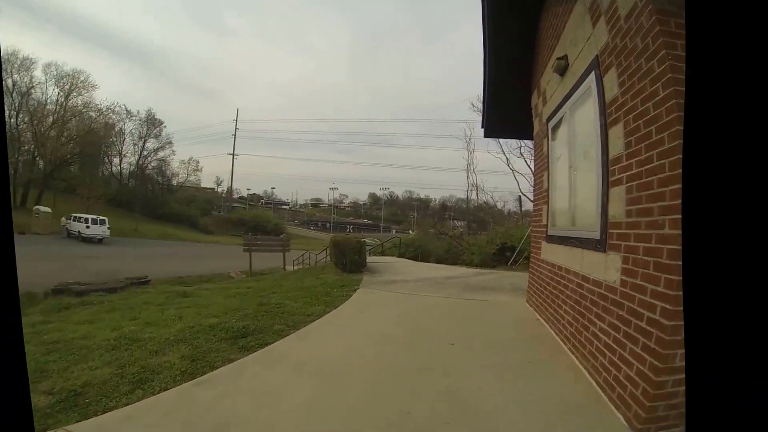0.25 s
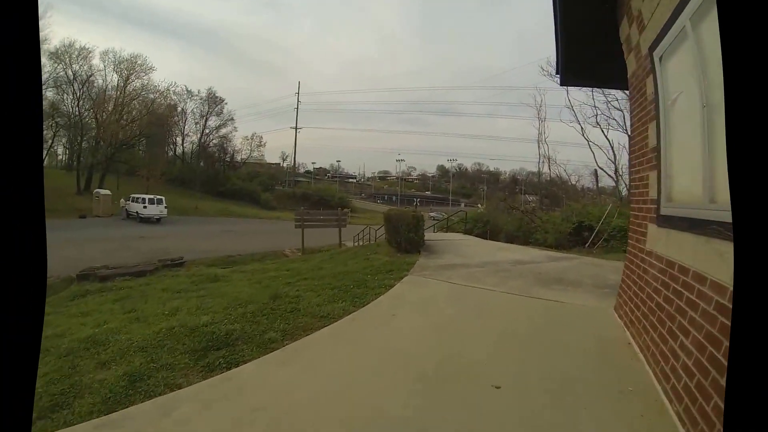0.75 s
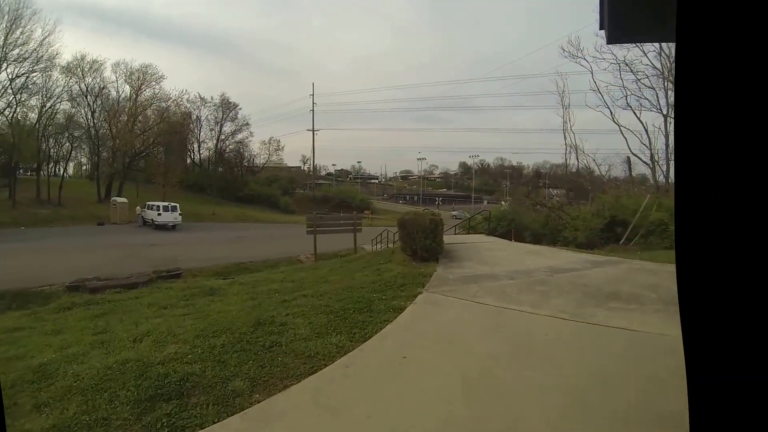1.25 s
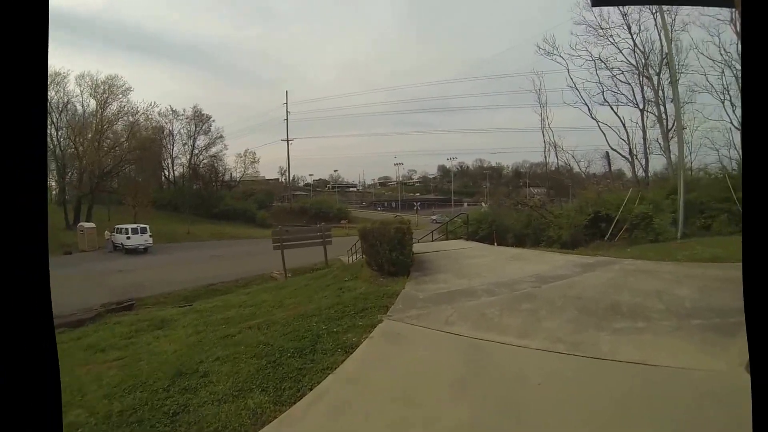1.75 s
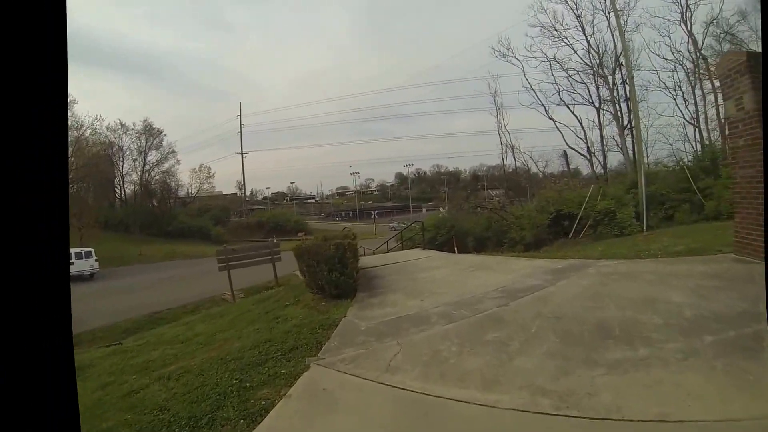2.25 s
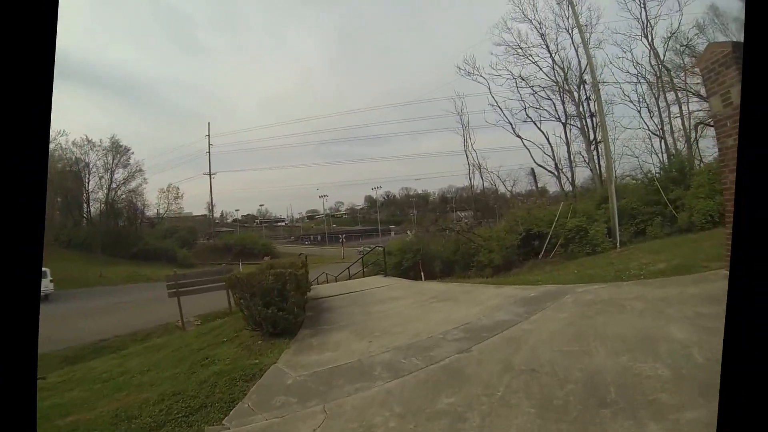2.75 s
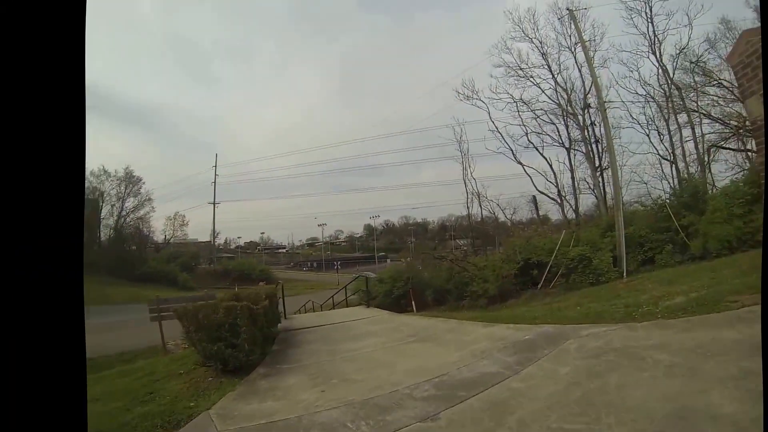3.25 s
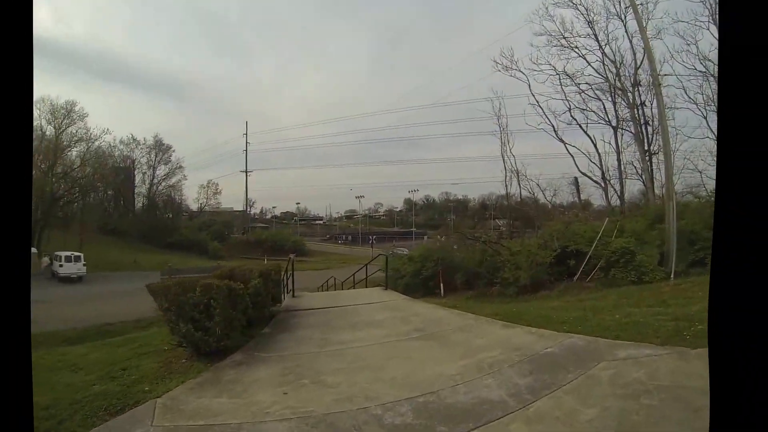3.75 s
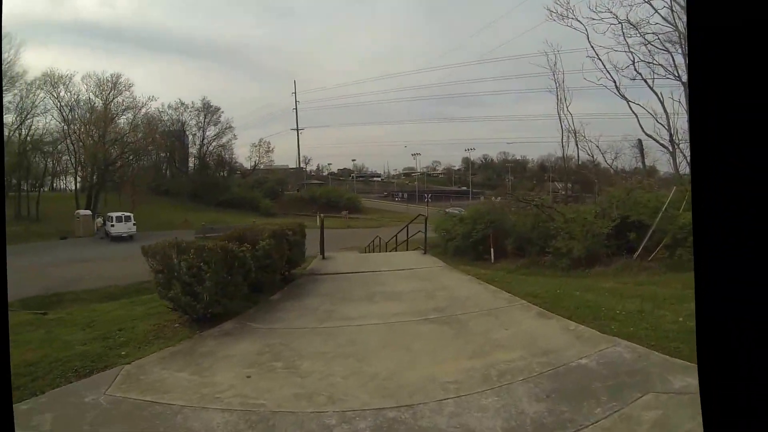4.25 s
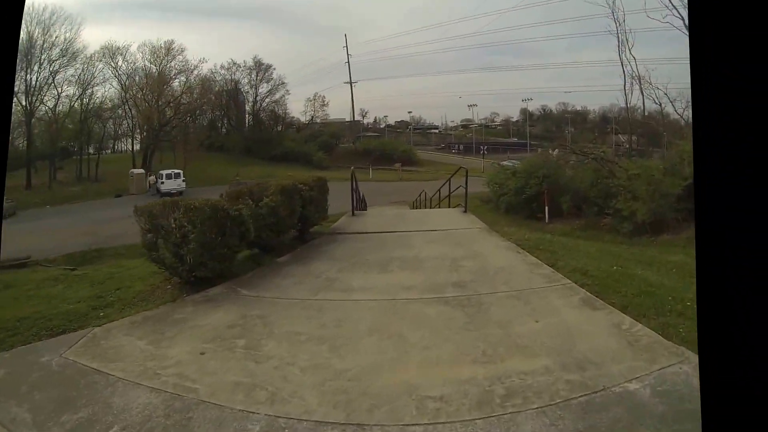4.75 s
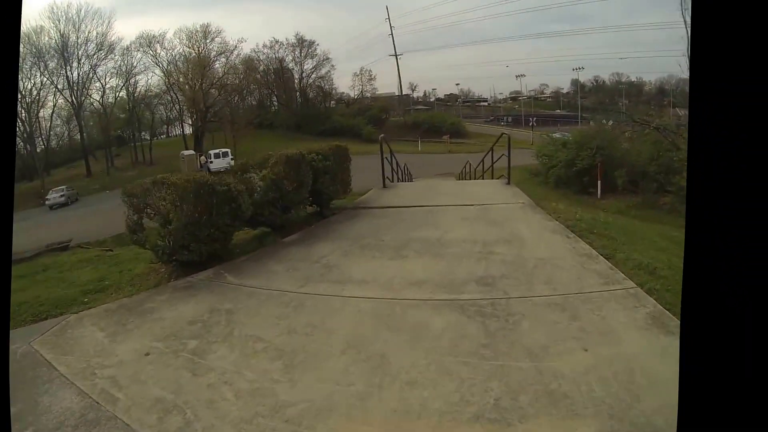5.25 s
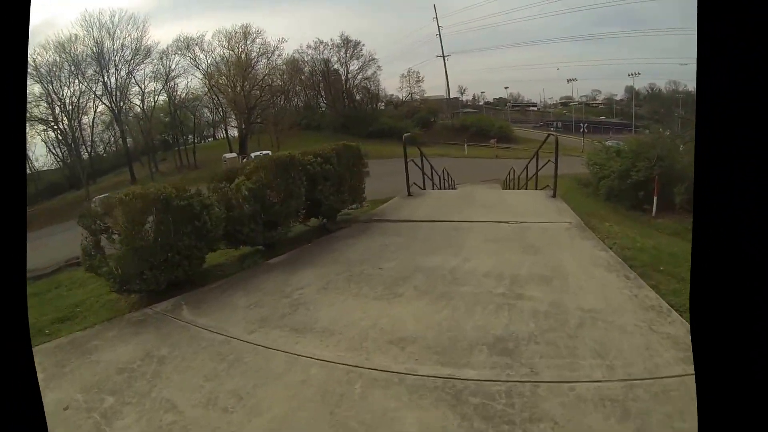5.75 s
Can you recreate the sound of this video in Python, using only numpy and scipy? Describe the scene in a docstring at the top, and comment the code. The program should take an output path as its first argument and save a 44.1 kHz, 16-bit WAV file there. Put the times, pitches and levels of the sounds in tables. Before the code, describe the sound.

A skateboard rolls on an outdoor concrete path for about six seconds, heard close from a microphone riding along in a hard case, which adds a hollow, nasal tone. Gritty wheel noise continues throughout over low, fluttering wind and faint hiss. The opening second is coarser, with quick double knocks at pavement joints around 0.4, 0.8 and 1.0 seconds. At 1.1 a very hard, bright clack overloads and leaves a short metallic ring. Rolling softens, then a gust buffets the microphone from 2.5, ending in another hard, thumping, ringing clack at 2.9. A scuff and a smaller clack follow near 3.15, and joints knock at 3.3 and 3.6. The rolling runs smoothly until a scuff and double clack around 5.15. From 5.2 to 5.9 sand crunches and loose parts chatter, with more joint knocks at 5.5 and 5.8, and the board is still rolling at the end.

```python
"""On a concrete path, close to a rolling skateboard: the microphone rides along in a hard camera case.
Wheel grit and the knocks of pavement joints come through the case, which honks near 1.5 kHz.
The hardest clacks overload the microphone and leave a metal part ringing. Loose parts chatter,
and sand crunches near the end. Moving air rumbles and buffets underneath, over a faint hiss."""
import sys
import numpy as np
from scipy import signal
from scipy.fft import rfft, irfft, next_fast_len
from scipy.io import wavfile
from scipy.ndimage import uniform_filter1d

SR = 44100
rng = np.random.default_rng(int(sys.argv[2]) if len(sys.argv) > 2 else 0)


def int16_out(signal):
    """Quantize to a 16-bit WAV file."""
    q = np.round(np.clip(np.atleast_2d(signal).T, -1, 1) * 32767)
    wavfile.write(sys.argv[1], SR, q.astype(np.int16))


N = 265041
TIME = np.arange(N) / SR
BINS = np.fft.rfftfreq(2048, 1 / SR)

# Rolling effort from speed and pavement, a sandy stretch, air with one strong gust near 2.8 s, and hiss.
# Each row: time in seconds, level in dB.
ROLL_LEVEL = [(0.0, -45.5), (1.0, -51.5), (1.4, -48.5), (1.75, -51.5), (2.6, -51), (3.4, -53), (3.8, -49.5),
              (4.7, -48.5), (5.15, -43.5), (5.68, -45.5), (5.86, -48.5), (6.01, -48.5)]
SAND_LEVEL = [(5.2, -96), (5.28, -60), (5.42, -66), (5.57, -55), (5.75, -63), (5.83, -64), (5.9, -94)]
AIR_LEVEL = [(0.0, -33.5), (0.45, -30), (0.6, -34), (1.15, -38.5), (1.4, -27.5), (1.7, -36), (2.35, -37.5),
             (2.55, -27), (2.88, -20), (2.96, -30.5), (3.55, -31), (3.9, -39), (4.7, -34.5), (5.45, -27.5),
             (5.75, -37), (6.01, -25.5)]
HISS_LEVEL = [(0.0, -63), (1.9, -64), (3.3, -61), (6.01, -59)]
# Coarser patches of concrete. Each row: middle and length in seconds, then grit, roar and case hum in dB.
COARSE_PATCHES = [(0.068, 0.46, -44.5, -46.5, -36), (0.732, 0.42, -49.5, -47, -46),
                  (1.417, 0.61, -59.5, -56.5, -65), (2.963, 0.74, -44.5, -52, -56.5),
                  (5.554, 0.22, -41, -42.5, -43)]
# Hard clacks. Each row: start in seconds, level in dB, case ring in Hz, treble lift in dB, thump in dB,
# thump pitch in Hz, metal ring in dB, bounce in dB, time to the rebound in seconds.
HARD_CLACKS = [(1.1092, 6.5, 2000, 14, -8, 194, -29, 3.5, 0.0051),
               (2.9203, 6.5, 1690, 0, -1.5, 647, -34.5, -5.5, 0.0037),
               (3.1558, -2.5, 1597, -5, -36, 150, -52, -25.5, 0.006),
               (5.151, -3.5, 1570, -1.5, -39, 150, -48, -20, 0.0044),
               (5.1754, -6, 1570, -11, -32, 200, -59, -28, 0.005)]
# Modes of the metal part. Each row: pitch in Hz, relative level in dB, seconds to fall 60 dB.
METAL_MODES = [(1965, -6, .55), (2412, -4, .18), (2654, 0, .23), (2939, -31, .7), (3478, -14, .63),
               (4091, -32, .5), (4290, -38, .6), (4791, -36, .35), (5469, -39, .65), (5911, -40, .5),
               (6347, -52, .45), (7400, -56, .35), (9679, -64, .6)]
# Joints, crossed by one wheel and then another. Each row: start and gap in seconds,
# first and second peak in dB, case ring in Hz, sharpness in dB.
PAVEMENT_JOINTS = [(0.380, 0.016, -14.5, -20.5, 1455, 14.5), (0.819, 0.012, -27.5, -27.5, 1460, 12.5),
                   (0.9669, 0.0426, -19.5, -23, 1280, 8.5), (3.292, 0.029, -20, -23, 1220, 7.5),
                   (3.5553, 0.0448, -27.5, -17.5, 1470, -5), (5.486, 0.0282, -22.5, -19.5, 1355, -6.5),
                   (5.8015, 0.0203, -21.5, -14.5, 1330, -13)]
# Single jolts of loose parts. Each row: start in seconds, peak in dB, sharpness in dB.
LOOSE_KNOCKS = [(0.163, -30.5, -1), (1.098, -22.5, 3), (1.207, -22, -13), (1.303, -33.5, 3),
                (2.9892, -22.5, -13), (3.1241, -28, -3), (3.137, -26, 18), (5.2746, -22, -4),
                (5.317, -26, -12), (5.5724, -17, -4), (5.592, -27, -4), (5.742, -26.5, -8),
                (5.9954, -19, -11)]
# Scuffs that build up to a clack. Each row: start and end in seconds, level in dB.
SCUFF_SPANS = [(0.765, 0.852, -50.5), (2.795, 2.92, -54), (3.0, 3.17, -55), (3.09, 3.167, -45),
               (5.068, 5.14, -45)]
# The largest buffets of air on the case. Each row: middle in seconds, level in dB, pitch in Hz.
AIR_BUFFETS = [(2.707, -15.5, 106), (2.732, -11, 126), (2.747, -13.5, 61), (2.795, -13, 65),
               (2.84, -28, 130), (2.868, -12, 44.6), (2.888, -13.5, 60), (2.989, -20.5, 79),
               (3.391, -23.5, 89), (3.502, -28.5, 103.7), (3.78, -25.5, 86.5)]
# The tone of each source at the microphone. Each row: frequency in Hz, relative level in dB.
GRIT_SPECTRUM = [(700, -21.5), (1030, -23), (1150, -1), (1280, 2.5), (1480, -1), (1650, -4.5),
                 (1900, -22.5), (2300, -18), (2800, -30), (3400, -26.5), (4200, -46.5), (5200, -43.5),
                 (9000, -44.5), (15000, -58)]
ROAR_SPECTRUM = [(40, -5), (110, -7.5), (220, 4.5), (380, -2.5), (550, 3), (760, -5), (1000, -7),
                 (1500, -13.5), (3000, -45.5), (12000, -94.5)]
SAND_SPECTRUM = [(100, 1.5), (600, 5.5), (1000, -0.5), (2300, 3.5), (3600, 6.5), (4300, -5.5), (5300, 0.5),
                 (7000, -9.5), (9500, -19), (13000, -19.5), (16000, -23.5)]
CLACK_SPECTRUM = [(60, -31), (500, -28.5), (900, -25), (1100, -14), (1270, -6), (1520, 3.5), (1790, 1),
                  (2100, -5), (2900, -10.5), (3650, -15), (3950, -46.5), (5000, -38.5), (8000, -61),
                  (15000, -83)]
KNOCK_SPECTRUM = [(60, -20.5), (250, -11.5), (400, -13), (530, -9), (850, -13), (1050, -9), (1250, 2.5),
                  (1550, 1), (1880, -14.5), (2250, -11.5), (2750, -23.5), (3400, -20.5), (4200, -42),
                  (5200, -37.5), (9000, -47.5), (15000, -66.5)]
SCUFF_SPECTRUM = [(900, -17.5), (1400, 9), (1900, 10.5), (2600, -4.5), (3600, -11), (4200, -30),
                  (10000, -66)]
RUMBLE_SPECTRUM = [(8, -16), (22, 5.5), (38, -2), (55, -3.5), (72, -15), (95, -25.5), (150, -29),
                   (300, -45), (700, -92), (5000, -130)]
HISS_SPECTRUM = [(1500, 5), (2300, 2.5), (2800, 3), (3600, 8), (4300, -5), (5200, 1.5), (5900, -9.5),
                 (7900, -8), (9200, -14), (9950, -5), (11000, -11), (13500, -12), (14300, -15),
                 (16000, -10)]
SWISH_SPECTRUM = [(3000, -25), (5500, 0), (10000, 1), (14500, 2), (15500, -20)]

KNOCK_HZ = 1332  # where loose parts ring the case


def rolling(grit_db=-1.5, roar_db=-7.0, patch_db=1, grains_per_s=700, grain_share=0.47):
    """Wheels on rough concrete, close up: a fine wash and single grains, swelling with the surface."""
    surface = amp(0.82 * wander(hz=34.5))
    grains = grain_share * unit(rng.standard_normal(N) * chance(grains_per_s))
    grit = colour(rng.standard_normal(N) + grains, GRIT_SPECTRUM)
    roar = colour(rng.standard_normal(N) + grains, ROAR_SPECTRUM)
    effort_db = curve(ROLL_LEVEL)
    grit_level = np.hypot(amp(effort_db + grit_db), amp(patch_db) * patches(column=2))
    roar_level = np.hypot(amp(effort_db + roar_db), amp(patch_db) * patches(column=3))
    return surface * (grit * grit_level + roar * roar_level)


def patches(column):
    """Gain of one layer, rising and falling as the wheels cross each coarser patch."""
    gain = np.zeros(N)
    for row in COARSE_PATCHES:
        middle, length = row[:2]
        position = np.clip((TIME - middle) / length, -.5, .5)
        gain += amp(row[column]) * np.cos(np.pi * position) ** 2
    return gain


def case_hum(hum_hz=1257, width_hz=170):
    """Dense grit on the coarser patches drives the lowest resonance of the case."""
    hum = shape(rng.standard_normal(N), lambda hz: bell(hz, hum_hz, width_hz))
    return hum * patches(column=4)


def clacks(crack_s=0.0015, thump_cycles=0.36, ring_tilt=0.7):
    """A hard blow raps the case and bounces, thumps the mount, and rings the metal for much longer."""
    out, t = np.zeros(N), np.arange(SR) / SR
    for s, db, case_hz, lift_db, thump_db, thump_hz, ring_db, bounce_db, rebound_s in HARD_CLACKS:
        add(out, s, amp(db) * rap(case_hz, lift_db))
        # a bright crack follows, then a duller rebound
        add(out, s + crack_s, amp(bounce_db + 1.5) * rap(case_hz=3170, lift_db=26.5))
        add(out, s + rebound_s, amp(bounce_db - 4) * rap(case_hz=1620, lift_db=9))
        thump = np.sin(2 * np.pi * thump_hz * t) * np.exp(-thump_hz * t / thump_cycles)
        add(out, s, amp(thump_db) * thump)
        for hz, mode_db, t60 in METAL_MODES:
            # a sharper blow reaches the higher modes
            start_db = ring_db + mode_db + ring_tilt * lift_db * np.log2(hz / 2500)
            add(out, s, amp(start_db - 60 * t / t60) * np.sin(2 * np.pi * hz * t))
    return out


def rap(case_hz, lift_db, ring_db=6):
    """One hard contact briefly rings the case around the microphone."""
    resonance_db = ring_db * bell(BINS, case_hz, width_hz=440)
    treble_db = lift_db * shelf(BINS, corner_hz=2260)
    case = response(spectrum_db(CLACK_SPECTRUM, BINS) + resonance_db + treble_db)
    return signal.fftconvolve(blow(chatter=0.018, t60=0.033), case)


def blow(chatter, t60):
    """One firm contact, then fine random chatter falling 60 dB in t60 seconds."""
    t = np.arange(SR // 8) / SR
    force = chatter * rng.standard_normal(len(t)) * amp(-60 * t / t60)
    force[0] = 1
    return force


def knocks(ring_db=6, treble_share=0.27):
    """Jolted parts touch and chatter to rest; sharp contacts bring out the case's upper resonance."""
    out = np.zeros(N)
    upper = bell(BINS, centre_hz=2275, width_hz=530) + treble_share * shelf(BINS, corner_hz=2900)
    for s, db, hz, sharp_db in jolts() + rattles():
        resonance_db = ring_db * bell(BINS, hz, width_hz=130)
        case = response(spectrum_db(KNOCK_SPECTRUM, BINS) + resonance_db + sharp_db * upper)
        knock = signal.fftconvolve(blow(chatter=0.21, t60=0.048), case)
        add(out, s, amp(db) * knock / abs(knock).max())
    return out


def jolts(shake_s=0.006, shake_db=-21):
    """The firm knocks. Each row: start in seconds, peak in dB, case ring in Hz, sharpness in dB."""
    rows = [(s, db, KNOCK_HZ, sharp_db) for s, db, sharp_db in LOOSE_KNOCKS]
    # each clack shakes the loose parts, a little later and weaker
    rows += [(s + shake_s, db + shake_db, KNOCK_HZ, 0) for s, db, *_ in HARD_CLACKS]
    for s, gap, first_db, second_db, hz, sharp_db in PAVEMENT_JOINTS:
        rows += [(s, first_db, hz, sharp_db), (s + gap, second_db, hz, sharp_db)]
    return rows


def rattles(per_s=70, above_sand_db=28.5, sharp_db=-4):
    """Small random knocks, as strong as the path is sandy; same columns as the jolts."""
    db = curve(SAND_LEVEL) + above_sand_db + 2 * rng.standard_normal(N)
    on_sand = (SAND_LEVEL[0][0] < TIME) & (TIME < SAND_LEVEL[-1][0])
    return [(TIME[i], db[i], KNOCK_HZ, sharp_db) for i in np.flatnonzero(chance(per_s) & on_sand)]


def sand_crunch(grains_per_s=130, jolt_db=23, decay_s=0.005):
    """Loose sand crunches under the wheels in short bursts, hardest when the board is jolted."""
    hits = chance(grains_per_s) * rng.uniform(0.95, 1, N)
    for s, db, *_ in jolts():
        add(hits, s, amp([db + jolt_db]))
    fade = np.exp(-TIME[:SR // 10] / decay_s)
    bursts = signal.fftconvolve(hits, fade)[:N] * rng.standard_normal(N)
    return amp(curve(SAND_LEVEL)) * colour(bursts, SAND_SPECTRUM)


def scuffs(rough_db=3):
    """Short gritty rubs: noise with a fast flicker in level."""
    level = np.zeros(N)
    for start, end, db in SCUFF_SPANS:
        add(level, start, amp(db) * signal.windows.tukey(round((end - start) * SR), .5))
    rub = rng.standard_normal(N) * amp(rough_db * wander(hz=200))
    return level * colour(rub, SCUFF_SPECTRUM)


def wind(rumble_db=-1, steadiness=0.42, flutter_db=3.0):
    """Air moving over the case: a low, fluttering turbulence with eddies on top."""
    air_db = curve(AIR_LEVEL)
    rumble = colour(rng.standard_normal(N), RUMBLE_SPECTRUM)
    strength = np.sqrt(abs(uniform_filter1d(rumble ** 2, size=4000)) + 1e-6)
    steadied = unit(rumble / strength ** steadiness)
    return eddies(air_db) + steadied * amp(air_db + rumble_db + flutter_db * wander(hz=14))


def eddies(air_db, per_s=16, gust_db=-17.5, growth=2.05, typical_hz=105, decay_cycles=0.3):
    """Large buffets and small random eddies each push and pull the air at the case once."""
    eddy_db = gust_db + growth * (air_db - air_db.max())  # weaker in calmer air
    eddy_hz = typical_hz * 2 ** rng.standard_normal(N)
    small = [(TIME[i], eddy_db[i], eddy_hz[i]) for i in np.flatnonzero(chance(per_s))]
    out, t = np.zeros(N), np.arange(-SR // 20, SR // 20) / SR
    for s, db, hz in AIR_BUFFETS + small:
        pulse = np.cos(2 * np.pi * hz * t) * np.exp(-abs(hz * t) / decay_cycles)
        add(out, s + t[0], amp(db) * pulse)
    return signal.sosfiltfilt(signal.butter(4, 450, fs=SR, output="sos"), out)


def swish(start_s=1.365, length_s=0.06, level_db=-69):
    """A brief, faint, very high swish of noise."""
    out, count = np.zeros(N), round(length_s * SR)
    noise = colour(rng.standard_normal(count), SWISH_SPECTRUM)
    add(out, start_s, amp(level_db) * noise * signal.windows.tukey(count, .5))
    return out


def hiss():
    """Faint even hiss behind everything, coloured by the case."""
    return colour(rng.standard_normal(N), HISS_SPECTRUM) * amp(curve(HISS_LEVEL))


def amp(db):
    """Decibels to gain."""
    return 10 ** (np.asarray(db) / 20)


def unit(x):
    """Scales to rms 1."""
    return x / np.sqrt(np.mean(x ** 2) + 1e-20)


def curve(rows):
    """A table of levels over time, at every sample."""
    return np.interp(TIME, *np.transpose(rows))


def spectrum_db(points, hz):
    """A spectrum in dB, interpolated on a log-frequency axis."""
    f, db = np.transpose(points)
    return np.interp(np.log(hz + 1), np.log(f + 1), db)


def add(mix, s, sound):
    """Mixes a sound in at s seconds."""
    part = mix[max(round(s * SR), 0):][:len(sound)]
    part += sound[:len(part)]


def shape(x, gain_at):
    """Filters by a gain that is a function of Hz, at rms 1."""
    size = next_fast_len(len(x))
    gain = gain_at(np.fft.rfftfreq(size, 1 / SR))
    return unit(irfft(rfft(x, size) * gain, size)[:len(x)])


def colour(x, points):
    """Gives a signal a spectrum from a table, at rms 1."""
    return shape(x, lambda hz: amp(spectrum_db(points, hz)))


def wander(hz):
    """Random drift no faster than hz, at rms 1."""
    return shape(rng.standard_normal(N), lambda f: f < hz)


def chance(per_s):
    """True at the samples where a random event falls."""
    return rng.random(N) < per_s / SR


def response(gain_db):
    """Minimum-phase ring with the given spectrum over BINS, at peak 1."""
    log_gain = np.log(amp(gain_db))
    mirrored = np.concatenate([log_gain, log_gain[-2:0:-1]])
    ring = np.fft.ifft(np.exp(np.conj(signal.hilbert(mirrored)))).real
    return ring / abs(ring).max()


def shelf(hz, corner_hz):
    """Rises from zero below the corner to one above it."""
    return 1 / (1 + (corner_hz / (hz + 1)) ** 6)


def bell(hz, centre_hz, width_hz):
    """One at the centre, falling away to both sides."""
    return np.exp(-((hz - centre_hz) / width_hz) ** 2)


def scene():
    """All sources at the one microphone in the case."""
    board = rolling() + case_hum() + sand_crunch() + clacks() + knocks() + scuffs()
    return (board + swish() + wind() + hiss())[None]


def record(dry, threshold_db=-14, recovery_db_per_s=120, duck_share=0.54, lag_s=0.014, edge_hz=15700):
    """Overload flattens the hardest clacks, gain control ducks just after them, the treble rolls off."""
    clipped = dry / (1 + dry ** 8) ** (1 / 8)
    power = signal.lfilter(np.ones(200) / 200, [1], clipped[0] ** 2)
    fall_db = TIME * recovery_db_per_s
    held_db = np.maximum.accumulate(10 * np.log10(power + 1e-12) + fall_db) - fall_db
    over_db = np.maximum(held_db - threshold_db, 0)
    lag = np.exp(-1 / (lag_s * SR))
    ducked = clipped / amp(duck_share * signal.lfilter([1 - lag], [1, -lag], over_db))
    soft = signal.sosfilt(signal.butter(2, 10500, fs=SR, output="sos"), ducked)
    steep_lowpass = signal.firwin(511, edge_hz, window=("kaiser", 9), fs=SR)
    return signal.oaconvolve(soft, steep_lowpass[None], "same")


dry = scene()
out = record(dry)
int16_out(out)
```